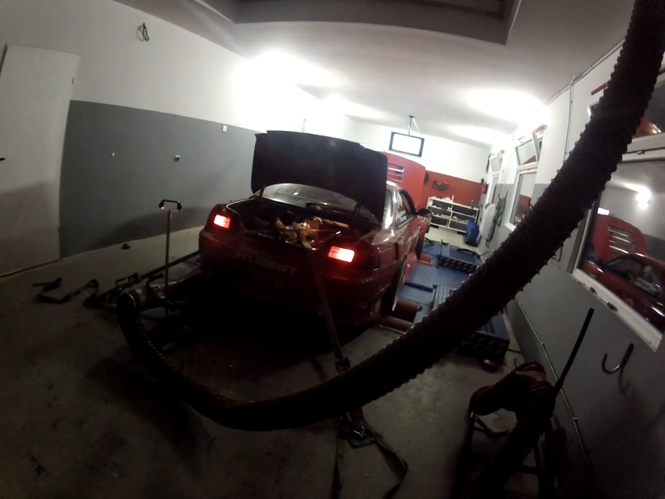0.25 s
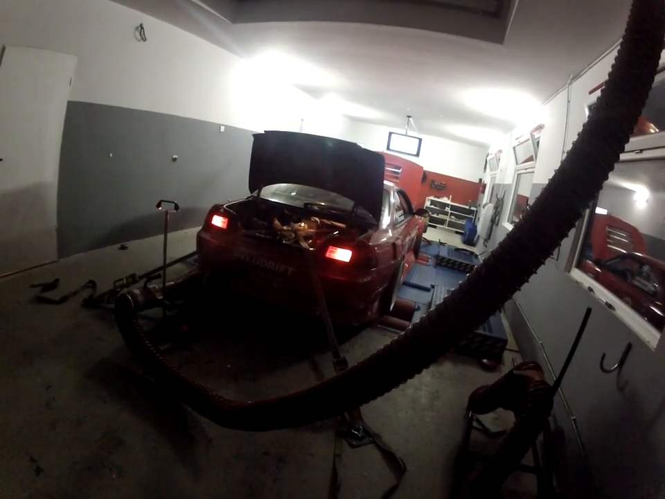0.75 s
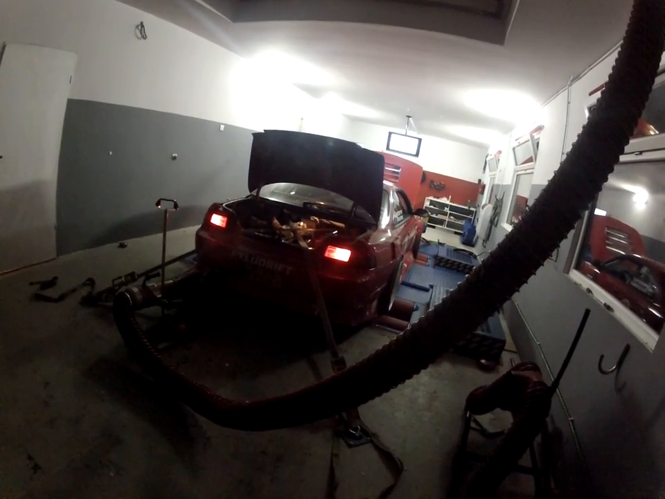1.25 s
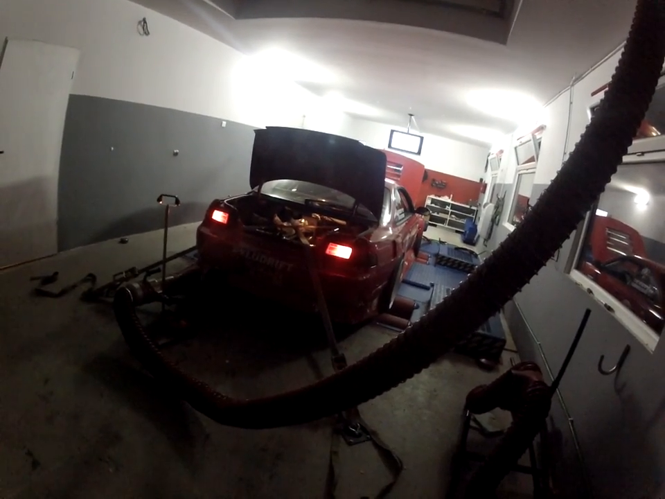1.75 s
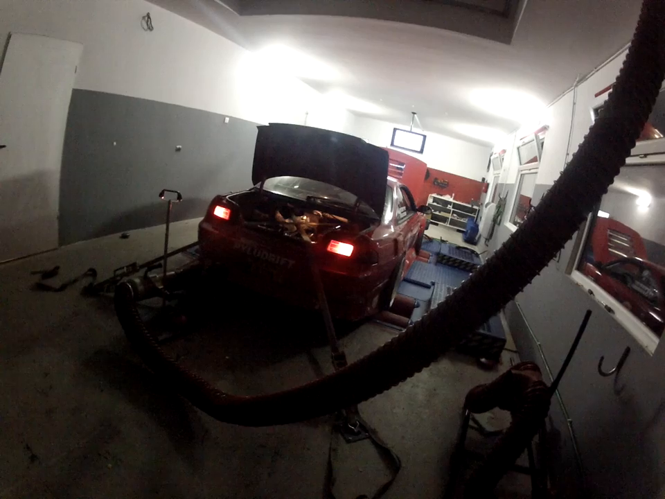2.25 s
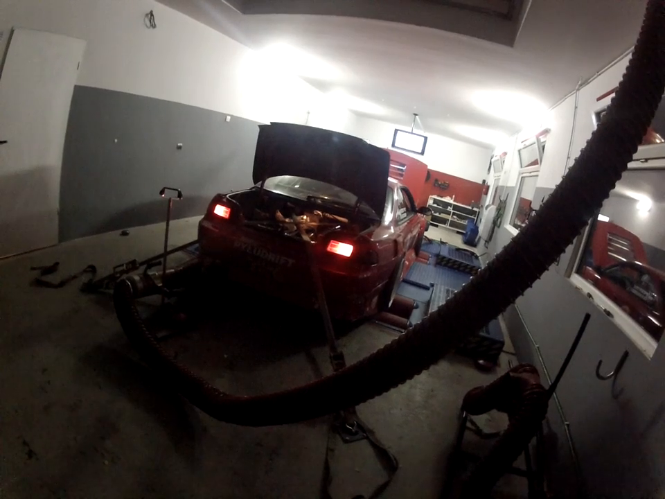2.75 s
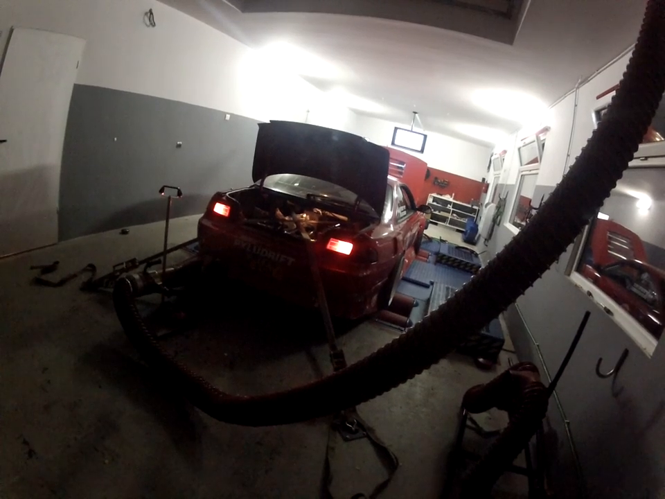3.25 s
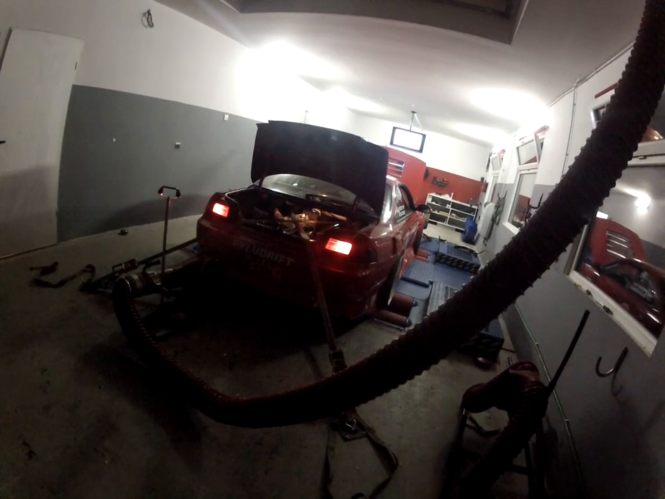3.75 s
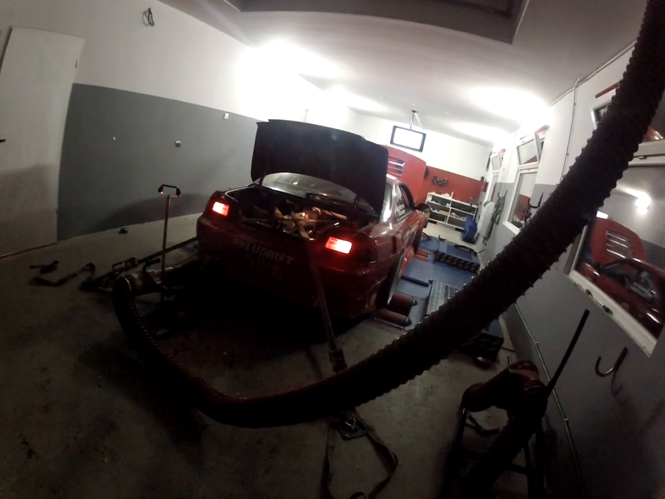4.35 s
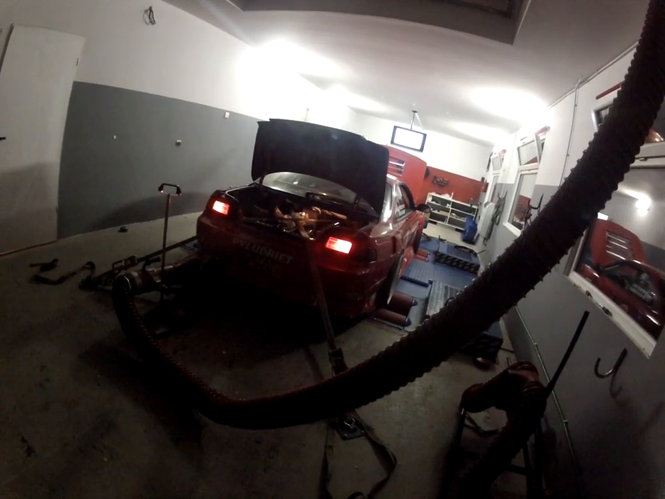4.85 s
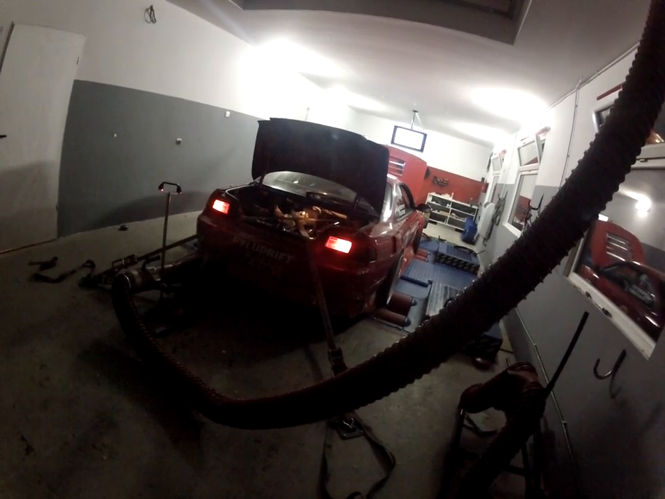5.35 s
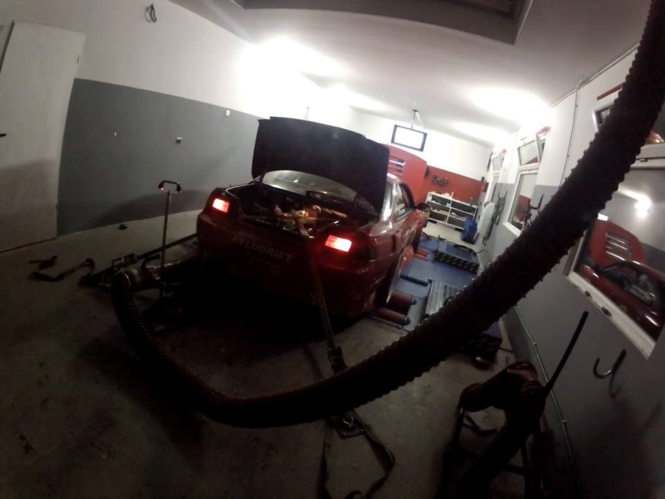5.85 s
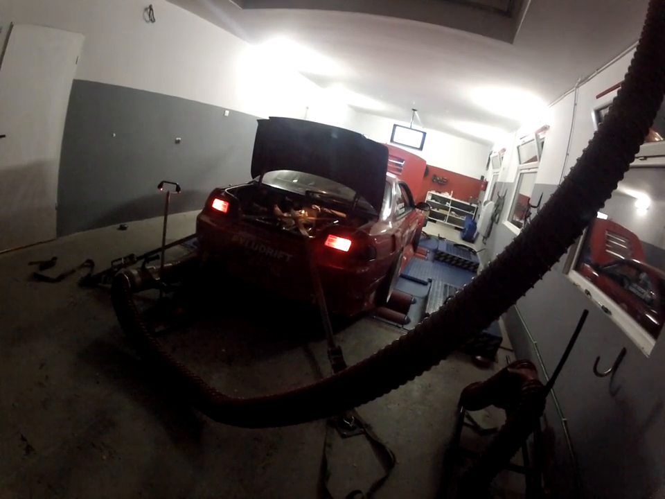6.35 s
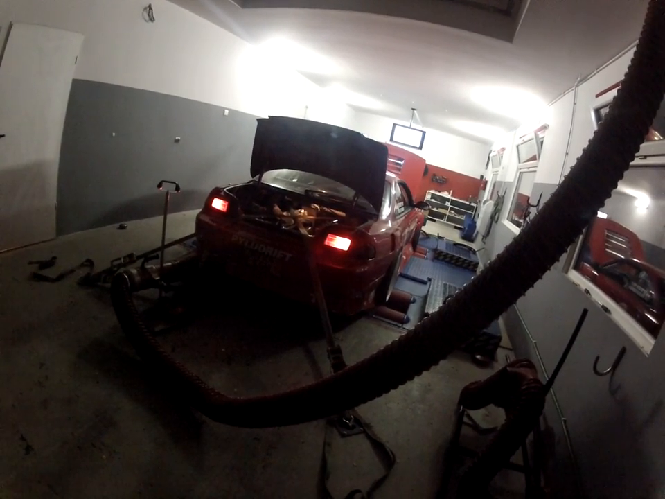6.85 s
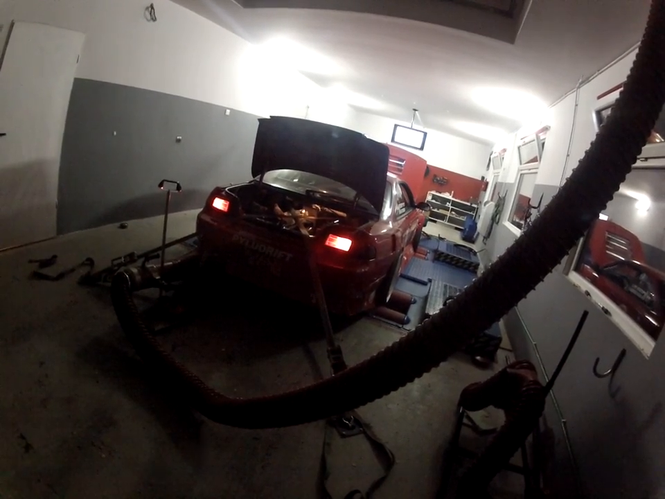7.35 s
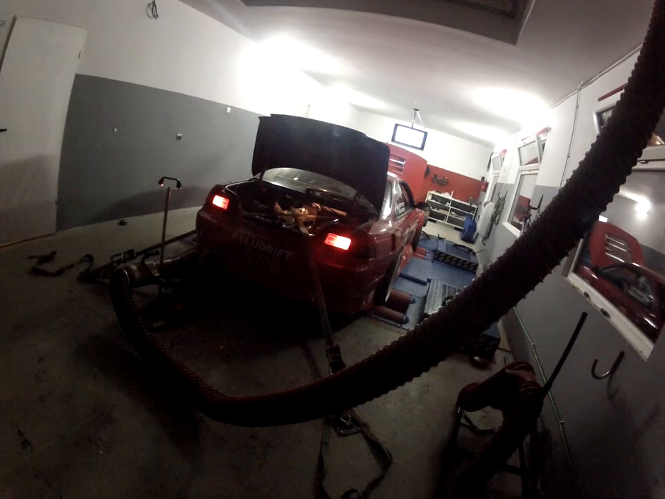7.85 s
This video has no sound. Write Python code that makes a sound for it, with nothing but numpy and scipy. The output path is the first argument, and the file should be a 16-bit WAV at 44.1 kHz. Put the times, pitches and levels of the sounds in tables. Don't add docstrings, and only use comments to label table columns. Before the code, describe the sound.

A four-cylinder car engine pulls steadily up through the revs on rollers in a hard-walled workshop, booming, rasping and clattering through gritty, low-fidelity sound.

```python
import sys
import numpy as np
from scipy import signal
from scipy.fft import rfft, irfft, next_fast_len
from scipy.io import wavfile

SR = 44100
rng = np.random.default_rng(int(sys.argv[2]) if len(sys.argv) > 2 else 0)


def unload_wav(signal):
    wavfile.write(
        sys.argv[1],
        SR,
        np.round(np.clip(np.atleast_2d(signal).T, -1, 1) * 32767).astype(np.int16),
    )


def natural_amplitude(level_db):
    exponent = np.asarray(level_db, float) / 20
    return 10 ** exponent


N = 357210

# (time [s], firing rate [1/s])
FIRING_RATE = [(0.0, 85.5), (0.45, 89.69), (0.9, 93.55), (1.35, 96.79), (1.8, 100.66), (2.25, 103.7),
               (2.7, 106.72), (3.15, 110.8), (3.6, 114.97), (4.05, 118.81), (4.5, 123.22), (4.95, 127.87),
               (5.4, 131.33), (5.85, 133.02), (6.3, 134.92), (7.2, 139.84), (7.65, 142.26), (8.1, 145.29)]
# (time [s], skip [firings])
SLIPS = [
    (1.559, .33),
]

# (time [s], whole orders to 7th [dB], whole orders above [dB], half orders above 6th [dB])
BOOM_LEVELS = [(0, -28.5, -33.5, -41), (1, -24.7, -28.3, -36), (2.26, -27.2, -28.8, -37),
               (2.3, -29.4, -31.8, -39), (3.5, -34.5, -34.9, -41), (5, -35.4, -32.3, -37),
               (6.5, -34.7, -35.8, -39), (8.1, -36.5, -32.6, -37)]
# (time [s], rasp [dB], clatter [dB])
UPPER_LEVELS = [(0, -26.5, -19.5), (.9, -21.5, -19), (1.8, -22, -17.5), (2.3, -25, -17.5),
                (3.5, -28, -16.5), (4.3, -27, -18), (5, -28, -18), (5.8, -26.5, -18), (6.5, -28.5, -18),
                (7.3, -33.5, -18), (8.1, -34.5, -18.5)]
# (time [s], valve ticks [dB], gas noise [dB])
CLATTER_MIX = [(0, -1, -2), (.9, 0, -2), (1.25, -4, -3), (1.5, 0, -3), (2.2, -8, -4), (3.9, -9, -5),
               (4.2, -2, -6), (5.2, 0, -7), (5.65, -11, -11), (6.2, 0, -8), (6.7, -8, -9), (7.4, -10, -9),
               (8.1, -6, -9)]
# (time [s], level [dB])
CLATTER_TOP = [(0, 6.5), (1, 7.5), (2.5, 3), (3.5, 4), (5, 9), (6.5, 7.5), (8.1, 7.5)]
# (time [s], level [dB])
ROAR_LEVELS = [(0, -37), (1, -37), (2.26, -39), (2.3, -44), (3.5, -48), (5, -50), (6.5, -52), (8.1, -52)]

# (position [firings], level [dB])
EXHAUST_CYCLE = [
    (0, 10.5),
    (1.036, 7),
    (2.012, 13.5),
    (3.049, 2),
    (0.198, -8.5),
    (2.621, 2),
]
# (position [firings], level [dB])
KNOCK_CYCLE = [
    (.67, -3),
    (1.63, -1.5),
    (2.68, -4),
    (3.65, 0),
]
# (position [firings], level [dB])
VALVE_CYCLE = [
    (0.081, -12),
    (1.164, -7.5),
    (1.979, -18),
    (2.26, -7),
    (3.111, -8.5),
]

# (frequency [Hz], level [dB])
TAIL_PIPE = [(600, -58), (900, -18.5), (980, 0), (1040, 4.5), (1190, 8.5), (1300, 8), (1500, -1),
             (1700, -0.5), (2000, -23)]
# (frequency [Hz], level [dB])
BLOCK = [(1200, -38), (1500, -13), (1750, -1.5), (1950, 3), (2170, 4.5), (2350, -4), (2600, -4),
         (2880, -6.5), (3100, -17), (3450, -15.5), (3700, -27.5), (3950, -27), (4300, -28.5)]
# (frequency [Hz], level [dB])
TYRES = [(20, -43), (60, 1), (100, -11), (300, -1), (600, 2), (900, 2), (1300, -27), (2000, -23),
         (4000, -55)]

# (frequency [Hz], signed height [1], width [Hz])
ROOM_WAVES = [(89.3, -1.25, 15.3), (89.5, 0.48, 2.9), (97.8, 1.81, 13.6), (97.9, -2.44, 7.7),
              (120.6, -3.91, 5.9), (127.4, 3.57, 12.9), (128.0, -4.11, 7.0), (139.9, 4.78, 10.4),
              (143.1, -4.95, 8.6), (146.6, 2.63, 3.3), (174.0, -1.71, 14.8), (185.9, 1.92, 3.9),
              (192.1, -1.22, 7.1), (205.4, -0.42, 2.9),
              (216.0, 1.01, 13.8), (225.9, -0.59, 2.9), (232.5, -1.06, 3.2), (249.4, 0.58, 3.1),
                    (264.6, 0.72, 6.7), (286.7, -0.34, 7.7), (293.9, -0.77, 2.9), (296.0, 1.09, 10.6),
                    (317.3, -0.79, 4.0), (327.2, 0.77, 11.1), (328.5, -0.93, 4.7), (349.5, -0.56, 5.5),
                    (361.7, -0.74, 8.5), (386.9, 0.46, 11.0),
              (406.2, -1.04, 4.3), (412.9, 0.72, 10.4), (431.7, 0.12, 2.9), (459.9, -0.15, 45.9),
               (475.0, 0.37, 6.3), (499.7, -0.35, 25.7), (524.0, 0.55, 4.4), (537.6, -0.08, 2.9),
               (548.4, -0.32, 8.7), (565.9, -0.1, 2.9), (573.7, 0.31, 3.3), (582.3, -0.18, 5.9),
               (599.1, -0.42, 12.9), (634.4, 0.57, 5.6),
              (652.2, -0.24, 3.4), (671.6, -0.55, 7.3), (689.5, -0.46, 6.5), (709.7, -0.08, 6.4),
                  (726.1, 0.12, 3.1), (761.9, 0.3, 10.6), (779.0, -0.33, 9.2), (806.4, 0.55, 10.1),
                  (828.5, -0.27, 11.6), (856.3, 0.5, 9.4), (883.4, -0.57, 4.1), (901.0, 0.25, 14.5),
                  (929.1, 0.22, 6.5), (947.2, -0.22, 19.5),
              (971.7, -0.6, 12.9), (1023.6, 1.35, 25.0), (1031.5, -1.32, 17.5), (1049.2, 0.78, 4.8),
                 (1079.5, -0.64, 14.3), (1090.9, 0.83, 7.0), (1118.1, -1.39, 10.4), (1135.3, 0.86, 2.9),
                 (1156.7, -1.31, 17.0), (1182.3, 1.35, 6.7), (1207.6, -2.42, 23.0), (1217.3, 1.78, 22.8),
                 (1246.9, -0.22, 5.2), (1296.4, 0.67, 39.2)]
# (frequency [Hz], width [Hz])
ENGINE_BAY = [(1400, 30), (1450, 20), (1490, 20), (1570, 30), (1695, 35), (1785, 30), (1860, 35),
              (1945, 35), (2015, 25), (2050, 20), (2120, 35), (2185, 30), (2250, 30), (2320, 35)]

WORKSHOP_T60_S = .35
BOOM_ENDS_HZ, WORKSHOP_BLURS_HZ = 1330, 1330
HALF_DB, QUARTER_DB, THREE_HALVES_DB = -13, -21, -14.5
BOOM_FLUTTER_DB = .75
CLATTER_FLUTTER_DB = 0.59
BAY_PEAK_DB = 3
RASP_WAVES_DB = -2.0
CAPTURE_HZ, HOLD = 8000, 4


def rms_one(x):
    return x / np.sqrt(np.mean(x ** 2) + 1e-20)


def in_time(rows):
    s, *columns = np.transpose(rows)
    return [np.interp(np.arange(N) / SR, s, column) for column in columns]


def firings(rate):
    count = np.cumsum(rate) / SR
    for s, skipped in SLIPS:
        count = count + skipped * (np.arange(N) >= s * SR)
    return count


def drift(rate_hz):
    r = np.exp(-2 * np.pi * rate_hz * 40 / SR)
    noise = rng.standard_normal(N // 40 + 2002)
    slow = signal.lfilter([1], [1, -2 * r, r * r], noise)[2000:]
    return np.interp(np.arange(N) / 40, np.arange(len(slow)), rms_one(slow))


def colour(x, spectrum):
    hz, db = np.transpose(spectrum)
    grid_hz = np.arange(4097) * SR / 8192 + 1
    cepstrum = irfft(np.log(natural_amplitude(np.interp(np.log(grid_hz), np.log(hz), db))))
    cepstrum[1:4096] *= 2
    cepstrum[4097:] = 0
    impulse = irfft(np.exp(rfft(cepstrum)))
    return rms_one(signal.fftconvolve(x, impulse)[:N])


def contacts(count, cycle, spread_db, jitter_s):
    place, level_db = np.transpose(cycle)
    wanted = np.arange(0, count[-1], 4)[:, None] + place
    timing, strength = rng.standard_normal((2, *wanted.shape))
    at = np.searchsorted(count, wanted) + np.round(jitter_s * SR * timing).astype(int)
    clicks = np.zeros(N)
    np.add.at(clicks, np.clip(at, 0, N - 1), natural_amplitude(level_db + spread_db * strength))
    return rms_one(clicks)


def puffs(clicks, puff_s, steady):
    decay = np.exp(-1 / (puff_s * SR))
    gate = rms_one(signal.lfilter([1], [1, -decay], clicks))
    return rms_one((gate + steady) * rng.standard_normal(N))


def standing_waves(hz):
    waves = ROOM_WAVES
    return sum(height / (1 + 2j * (hz - centre_hz) / width_hz) for centre_hz, height, width_hz in waves)


def workshop(x, wet_db):
    size = next_fast_len(N + SR)
    turn = -2j * np.pi * np.arange(size // 2 + 1) / size
    response = 0
    for k, lag in enumerate([613, 757, 887, 1013, 1151, 1291, 1433, 1607, 1783, 1973]):
        echo = natural_amplitude(-60 * lag / SR / WORKSHOP_T60_S) * np.exp(turn * lag)
        response = response + (-1) ** k * echo / (1 - echo)
    return rms_one(irfft(rfft(x, size) * (1 + natural_amplitude(wet_db) * response), size)[:N])


def engine_bay(x):
    rings = 0
    for hz, width_hz in ENGINE_BAY:
        r, w = np.exp(-np.pi * width_hz / SR), 2 * np.pi * hz / SR
        gain = (1 - r * r) / 2
        rings = rings + signal.lfilter([gain, 0, -gain], [1, -2 * r * np.cos(w), r * r], x)
    return x + natural_amplitude(BAY_PEAK_DB) * rings


def order_tones(count, rate, orders, levels_db, starts):
    hz = np.arange(20, 2400, .5)
    heard = standing_waves(hz) / np.sqrt(1 + (hz / BOOM_ENDS_HZ) ** 32)
    count, rate = count[::8], rate[::8]
    low = 0
    for order, db, start in zip(orders, levels_db, starts):
        db = db + BOOM_FLUTTER_DB * np.log2(1 + order) * drift(7)[::8]
        turning = np.exp(2j * np.pi * (order * count + start))
        tone = (np.interp(order * rate, hz, heard) * turning).imag
        low = low + np.sqrt(2) * natural_amplitude(db) * tone
    return signal.resample_poly(low, 8, 1)[:N]


def boom(count, rate, low_db, high_db, halves_db):
    quarter = np.array([q for q in range(4, 63) if q < 42 or q % 2 == 0])
    faint = quarter % 4 > 0
    halves = (quarter % 4 == 2) & (quarter > 24)
    kind_db = np.array([0, QUARTER_DB, HALF_DB, QUARTER_DB])[quarter % 4] * ~halves
    kind_db = kind_db + 1.5 * faint * rng.standard_normal(len(quarter))
    kind_db = np.where(quarter == 6, THREE_HALVES_DB, kind_db)
    lines = np.array([quarter / 4, kind_db, faint * rng.random(len(quarter))])
    low = (quarter < 30) & (quarter != 6)
    groups = [(low_db, low & ~halves), (high_db, ~low & ~halves), (halves_db, halves)]
    return sum(natural_amplitude(db) * order_tones(count, rate, *lines[:, chosen]) for db, chosen in groups)


def rasp(count, level_db, gas_db):
    pulses = contacts(count, EXHAUST_CYCLE, spread_db=1.2, jitter_s=1.5e-5)
    gas = natural_amplitude(gas_db - 6) * puffs(pulses, puff_s=.004, steady=2)
    piped = colour(pulses + gas, TAIL_PIPE)
    size = next_fast_len(N + SR)
    hz = np.arange(size // 2 + 1) * SR / size
    low = 1 / (1 + (hz / WORKSHOP_BLURS_HZ) ** 24)
    coarse_hz = hz[:2400 * size // SR:4]
    waves = np.interp(hz, coarse_hz, standing_waves(coarse_hz))
    below = natural_amplitude(RASP_WAVES_DB) * low * waves * rfft(piped, size)
    above = (1 - low) * rfft(workshop(engine_bay(piped), wet_db=-15), size)
    return natural_amplitude(level_db + .5) * rms_one(irfft(below + above, size)[:N])


def swell(x, hz, r):
    poles = [1, -2 * r * np.cos(2 * np.pi * hz / SR), r * r]
    return signal.sosfilt([poles[::-1] + poles] * 2, x)


def clatter(count, level_db, valve_db, gas_db):
    knocks = contacts(count, KNOCK_CYCLE, spread_db=1.8, jitter_s=1.2e-5)
    knocks = knocks + natural_amplitude(valve_db) * contacts(count, VALVE_CYCLE, spread_db=1.8, jitter_s=1.2e-5)
    gas = natural_amplitude(gas_db) * puffs(knocks, puff_s=.003, steady=1.5)
    even = np.sqrt(1 + natural_amplitude(2 * valve_db) + natural_amplitude(2 * gas_db))
    block = colour(swell((knocks + gas) / even, hz=1854, r=0.958), BLOCK)
    top = signal.sosfiltfilt(signal.butter(4, 2600, "high", fs=SR, output="sos"), block)
    smeared_top = swell(top, hz=3100, r=0.94)
    block = block - top + natural_amplitude(*in_time(CLATTER_TOP)) * smeared_top
    return natural_amplitude(level_db) * workshop(engine_bay(block), wet_db=-15)


def tyre_roar(level_db):
    return natural_amplitude(level_db + 1.2 * drift(6)) * colour(rng.standard_normal(N), TYRES)


def scene():
    rate, = in_time(FIRING_RATE)
    count = firings(rate)
    rasp_db, clatter_db = in_time(UPPER_LEVELS)
    valve_db, gas_db = in_time(CLATTER_MIX)
    roar_db, = in_time(ROAR_LEVELS)
    exhaust = boom(count, rate, *in_time(BOOM_LEVELS)) + rasp(count, rasp_db, gas_db)
    engine = clatter(count, clatter_db + CLATTER_FLUTTER_DB * drift(17), valve_db, gas_db)
    return (exhaust + engine + tyre_roar(roar_db))[None]


def low_pass(x):
    return signal.sosfilt(signal.butter(12, 15720, fs=SR, output="sos"), x)


def record(dry):
    captured = signal.resample_poly(dry, CAPTURE_HZ // 100, SR // 100, axis=1)
    captured = 1.237 * np.tanh(captured / 1.146)
    held = np.repeat(captured, HOLD, axis=1)
    out = signal.resample_poly(held, SR // 100, CAPTURE_HZ * HOLD // 100, axis=1)[:, :N]
    out = signal.sosfilt(signal.cheby2(12, 40, 15500, fs=SR, output="sos"), out)
    return low_pass(out)


dry = scene()
out = record(dry)
unload_wav(out)
```